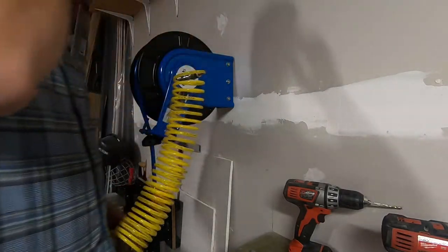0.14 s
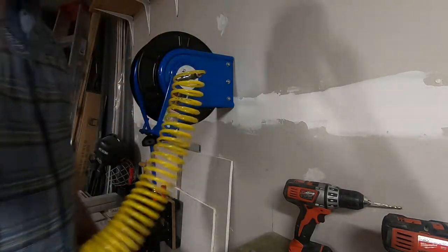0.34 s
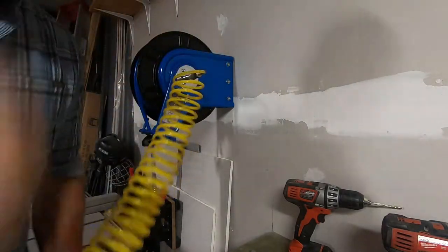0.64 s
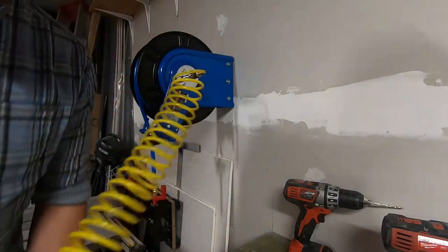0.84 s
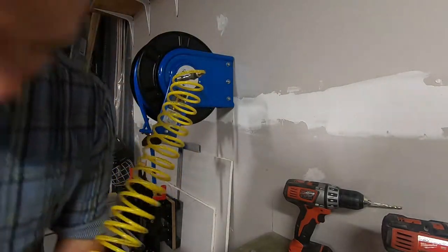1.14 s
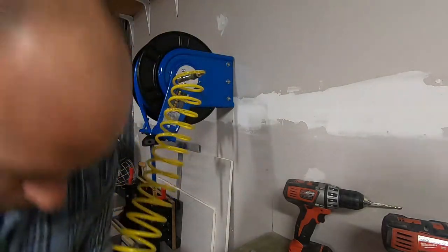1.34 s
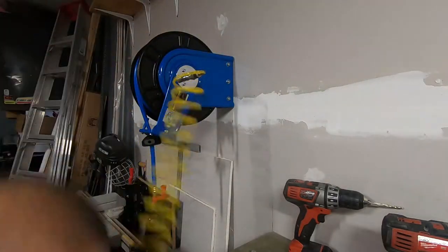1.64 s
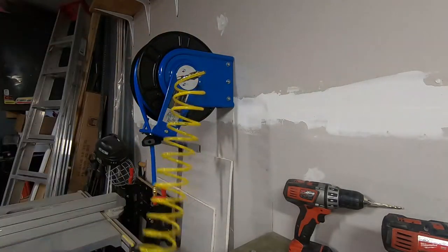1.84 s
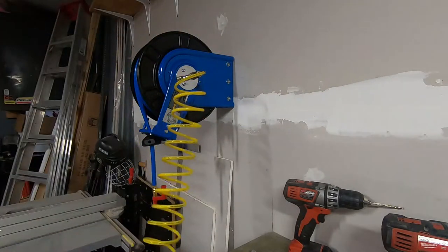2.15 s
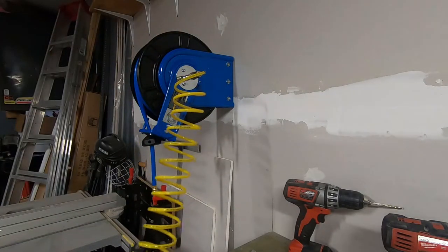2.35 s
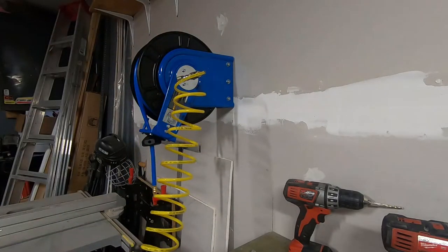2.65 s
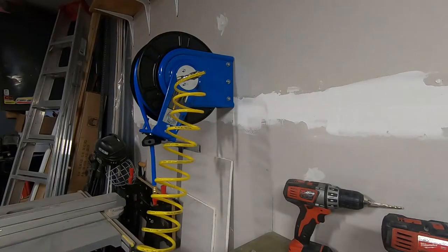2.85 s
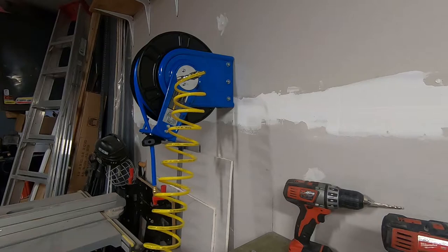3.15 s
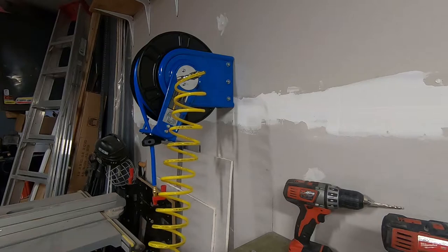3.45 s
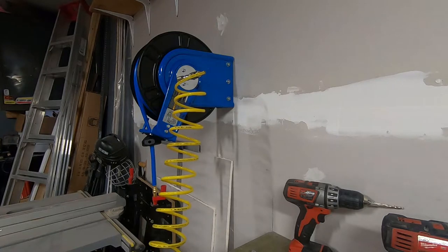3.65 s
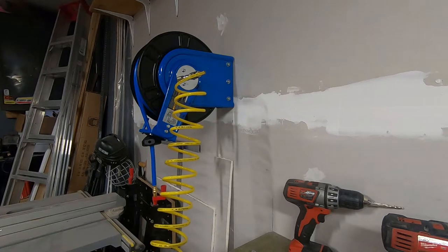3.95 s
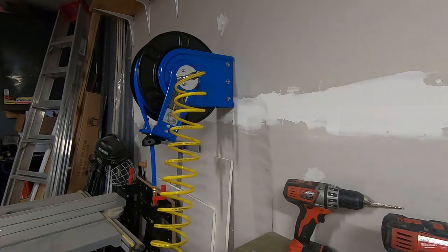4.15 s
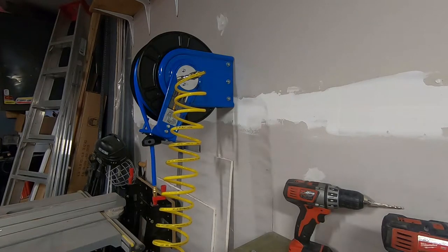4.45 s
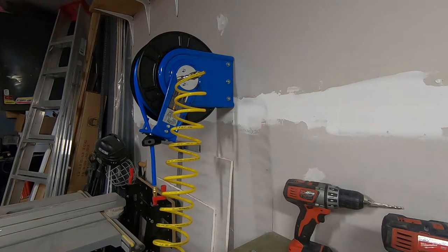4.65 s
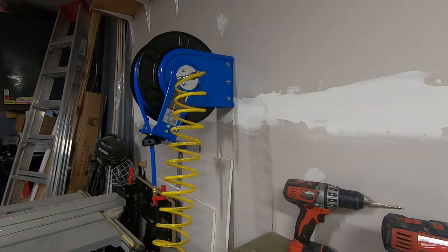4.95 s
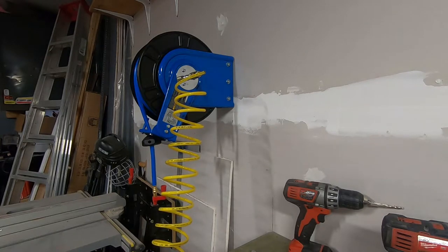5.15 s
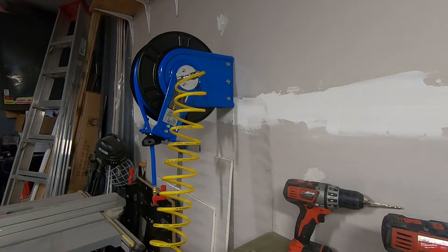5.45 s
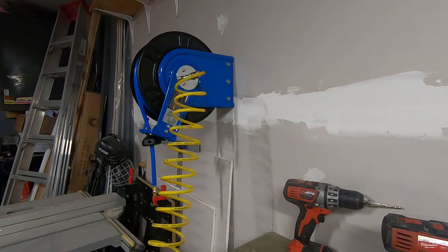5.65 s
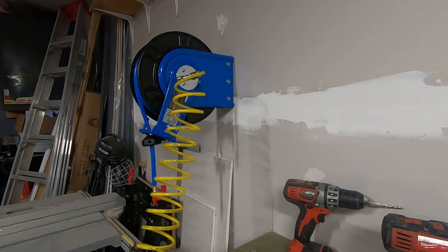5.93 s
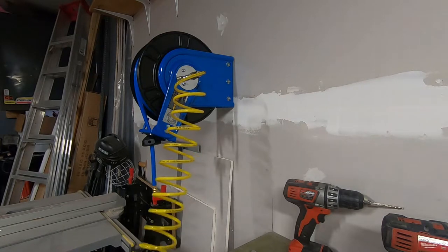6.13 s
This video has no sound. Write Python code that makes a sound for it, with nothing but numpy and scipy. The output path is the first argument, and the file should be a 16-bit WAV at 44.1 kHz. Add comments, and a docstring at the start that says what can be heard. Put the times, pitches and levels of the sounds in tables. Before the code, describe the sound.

Cloth rustles and hose fittings click in a garage, then compressed air spits and rushes out with a loud, high whistle.

```python
"""In a garage a slowly falling motor hum and a small leak lie under everything. From 0.8 s someone
brushes past and fumbles an air hose onto its coupler: cloth rustles, the hose bumps, the fittings
click and ring, the hose squeaks in the grip. At 4.4 s air spits from the half-seated coupler. Once it
seals, air rushes in gusts from the open hose end, which whistles higher as the pressure builds and
now and then breaks into a rasp."""
import sys
import numpy as np
from scipy import signal
from scipy.fft import rfft, irfft, next_fast_len
from scipy.io import wavfile
from scipy.ndimage import uniform_filter1d, minimum_filter1d

SR = 44100
rng = np.random.default_rng(int(sys.argv[2]) if len(sys.argv) > 2 else 0)


def output_pcm(signal):
    """Save a mono or channel-first signal as 16-bit PCM at the path in sys.argv[1].

    Samples are clipped to [-1, 1] before scaling.
    """
    pcm = np.clip(np.atleast_2d(signal).T, -1, 1) * 32767
    wavfile.write(sys.argv[1], SR, np.round(pcm).astype(np.int16))


N = 277389
TIME = np.arange(N) / SR


def undb(db):
    """Decibels to gain."""
    return 10 ** (np.asarray(db) / 20)


def unit(x):
    """Scale to rms 1."""
    return x / np.sqrt(np.mean(x ** 2))


def curve(rows):
    """Linear interpolation of (time, value) rows."""
    return np.interp(TIME, *np.transpose(rows))


def loudness(rows):
    """Gain from (time, dB) rows, fading fast outside their span."""
    outside_s = np.maximum(rows[0][0] - TIME, TIME - rows[-1][0]).clip(0)
    return undb(curve(rows)) * np.exp(-outside_s / 0.0073)


def envelope(start_s, end_s, attack_s, release_s=1):
    """Exponential rise, hold, exponential release."""
    rise = 1 - np.exp(-(TIME - start_s).clip(0) / attack_s)
    return rise * np.exp(-(TIME - end_s).clip(0) / release_s)


def walk(rate_hz):
    """Smooth random drift, rms 1."""
    size = max(int(SR / rate_hz), 1)
    steps = np.repeat(rng.standard_normal(N // size + 2), size)
    return unit(uniform_filter1d(steps, size)[:N])


def spectral(x, response):
    """Filter by a function of frequency."""
    size = next_fast_len(x.shape[-1], real=True)
    hz = np.maximum(np.arange(size // 2 + 1) * SR / size, 1)
    return irfft(rfft(x, size) * response(hz), size)[..., :x.shape[-1]]


def colour(x, points):
    """Filter by (Hz, dB) points."""
    hz, db = np.transpose(points)
    return spectral(x, lambda f: undb(np.interp(np.log(f), np.log(hz), db)))


def band(x, hz, width_hz):
    """One resonance, unity gain at centre."""
    return spectral(x, lambda f: 1 / (1 + 1j * (f - hz ** 2 / f) / width_hz))


def lowpass(x, hz, order):
    """Maximally flat low-pass."""
    return signal.sosfilt(signal.butter(order, min(hz, SR / 3), fs=SR, output="sos"), x)


def pan(db):
    """Constant-power gains for a left-minus-right level."""
    gains = undb(np.array([db, -db]).reshape(2, -1) / 2)
    return gains / np.sqrt(np.mean(gains ** 2, axis=0))


def add(track, start_s, sound):
    """Mix a short sound in."""
    start = int(start_s * SR)
    track[start:start + len(sound)] += sound[:N - start]


# diffuse field: (frequency [Hz], side over mid [dB])
SIDE_SPECTRUM = [(100, -6), (300, -9), (700, -0.5), (3000, -4.5), (5000, -4), (7000, 3.5), (15000, 4)]

def diffuse(size):
    """Noise from all sides: left and right are more alike in the bass."""
    mid, side = rng.standard_normal((2, size))
    side = colour(side, SIDE_SPECTRUM)
    return unit(np.array([mid + side, mid - side]))


def garage(x, wet_db, t60_s=0.55, treble_hz=10100):
    """Direct sound, strong early reflections, then a tail whose treble dies first."""
    t = TIME[:SR // 2]
    noise = diffuse(len(t))
    low = lowpass(noise, treble_hz, order=1)
    tail = (low + (noise - low) * np.exp(-t / .04)) * undb(-60 * t / t60_s)
    early_boost = 1 + 4.2 * np.exp(-t / 0.002)
    response = unit(tail * early_boost * (t > .001)) / np.sqrt(len(t))
    wet = signal.oaconvolve(np.atleast_2d(x), response, axes=1)[:, :N]
    return (x + undb(wet_db) * wet) / np.hypot(1, undb(wet_db))


# motor speed: (time [s], pitch [Hz])
HUM_PITCH = [(0, 134.5), (1.5, 131), (3.2, 126.5), (4.2, 128), (6.29, 124.5)]
# hum: (time [s], relative level [dB])
HUM_LEVEL = [(0.0, -52), (0.24, -47), (0.68, -56.5), (0.96, -48), (1.59, -41.5), (2.61, -51.5), (3.43, -46),
             (3.59, -40), (4.01, -45.5), (4.13, -42), (4.54, -45.5), (4.59, -39.5), (4.75, -48),
             (5.29, -61), (5.94, -56.5), (6.29, -61)]

def motor_hum(gain_db=-2, waver_db=1.37, octave_db=-23, drift_hz=0.28):
    """A coasting motor hums lower as it slows."""
    phase = 2 * np.pi * np.cumsum(curve(HUM_PITCH) + drift_hz * walk(8)) / SR
    tone = unit(np.sin(phase) + undb(octave_db) * np.sin(2 * phase))
    return tone * loudness(HUM_LEVEL) * undb(gain_db + waver_db * walk(9))


# leak hiss: (frequency [Hz], gain [dB])
LEAK_SPECTRUM = [(2500, -48), (3700, -15), (4400, -9.5), (4900, -1.5), (5250, -9.5), (5900, -26),
                 (7300, -26), (11000, -41)]

def leak(level_db=-65):
    """A small leak hisses thinly, swelling and ebbing."""
    return unit(colour(diffuse(N), LEAK_SPECTRUM)) * undb(level_db + walk(5.7))


# room noise: (frequency [Hz], gain [dB])
RUMBLE_SPECTRUM = [(25, 6.5), (80, 26.5), (190, 25), (300, 13.5), (450, 7), (850, 7), (2000, 2.5),
                   (3400, -1.5), (7300, -7.5), (12000, -28)]

def room_rumble(level_db=-61):
    """Low diffuse noise, drifting in level."""
    return unit(colour(diffuse(N), RUMBLE_SPECTRUM)) * undb(level_db + walk(1.1))


# plug contacts: (time [s], relative peak [dB], main pitch [Hz], scrape decay [s], snap gain [dB])
CLICKS = [(0.17, -57, 1300, 0.013, -66), (2.437, -29, 1310, 0.012, -41), (2.588, -29, 1520, 0.007, -42.5),
          (2.615, -37.5, 1260, 0.017, -69), (2.753, -33, 2300, 0.021, -56),
          (3.128, -34, 2100, 0.039, -55.5), (3.249, -38, 1230, 0.0064, -78), (3.318, -40, 2400, 0.018, -56),
          (3.407, -34.5, 1900, 0.016, -51), (3.55, -44.5, 1240, 0.017, -82),
          (3.655, -46.5, 1230, 0.016, -84), (3.712, -42.5, 1380, 0.012, -80),
          (3.734, -34, 920, 0.0083, -83), (4.07, -46, 1600, 0.046, -70), (4.272, -35, 1220, 0.013, -39.5)]
# coupler and reel modes: (frequency [Hz], gain [dB], t60 [s])
METAL_MODES = [(936, -3.5, 0.28), (1233, 6, 0.14), (1309, 3.5, 0.14), (1455, -2, 0.09), (2048, -1, 0.1),
               (2160, -7, 0.2), (2434, -4.5, 0.14), (2915, 4.5, 0.073), (2994, 3, 0.12), (3890, -7, 0.097),
               (4350, -11, 0.05)]
# unpitched click body: (frequency [Hz], gain [dB])
CRACK_SPECTRUM = [(200, -5), (550, -10.5), (850, 3), (1400, 3.5), (2900, 3), (4200, -19.5), (6000, -31),
                  (15000, -77)]
# bright click edge: (frequency [Hz], gain [dB])
SNAP_SPECTRUM = [(2000, -36), (4000, 13.5), (7000, 2), (8500, -11), (10500, -16), (13000, -40)]

def coupler_clicks(gain_db=5, focus_db_per_oct=5, snap_gain_db=3, crack_db=-2.5,
                   detune=0.0092, scatter_db=1.4):
    """The plug scrapes and snaps against the coupler, ringing the metal behind it."""
    out, t = np.zeros(N), TIME[:SR // 2]
    for start_s, peak_db, main_hz, scrape_s, snap_db in CLICKS:
        scrape = rng.standard_normal(len(t)) * np.exp(-t / scrape_s) * (1 - np.exp(-t / 0.0067))
        ring = 0
        for hz, mode_db, t60_s in METAL_MODES:
            # each contact favours modes near one pitch; the grip detunes them
            falloff_db = focus_db_per_oct * abs(np.log2(hz / main_hz))
            strength = undb(mode_db - falloff_db + scatter_db * rng.standard_normal())
            phase = 2 * np.pi * (hz * (1 + detune * rng.standard_normal()) * t + rng.random())
            ring += strength * np.sin(phase) * undb(-60 * t / t60_s)
        crack = undb(crack_db) * unit(colour(scrape, CRACK_SPECTRUM))
        hit = unit(ring * (1 - np.exp(-t / 0.0037))) + crack
        snap = colour(scrape, SNAP_SPECTRUM) * undb(snap_db + snap_gain_db)
        add(out, start_s, hit / abs(hit).max() * undb(peak_db + gain_db) + snap)
    return garage(out, wet_db=5.5)


# shirt and hose strokes: (start [s], end [s], relative body level [dB], sheen level [dB])
STROKES = [(0.8, 0.91, -79, -60.5), (0.955, 1.94, -54.5, -56.5), (1.044, 1.18, -54, -48),
           (1.173, 1.372, -49, -56.5), (1.56, 1.867, -48.5, -55.5), (1.7, 1.778, -43.5, -52),
           (1.925, 2.003, -33.5, -42), (1.96, 2.086, -40, -41), (2.037, 2.106, -34, -52)]
# friction noise: (frequency [Hz], gain [dB])
RUSTLE_SPECTRUM = [(150, -7.5), (250, -11.5), (590, -3.5), (642, -7.5), (799, -8), (1280, -11),
                   (1440, -14.5), (1950, -16), (2830, -22), (7380, -32), (14000, -49.5)]

def rustle(body_gain_db=1, grain_db=3, catch_db=2, attack_s=0.023, release_s=0.035):
    """Cloth and hose slide in tiny catches; lighter contact leaves mostly the sheen."""
    strokes = np.array([envelope(start, end, attack_s, release_s) for start, end, _, _ in STROKES])
    stroke_gains = undb(np.array(STROKES)[:, 2:].T)
    body_gain, sheen_gain = np.sqrt(stroke_gains ** 2 @ strokes ** 2)  # overlaps add in power
    grains = colour(rng.standard_normal(N) * undb(grain_db * walk(1500)), RUSTLE_SPECTRUM)
    grains = signal.sosfilt(signal.butter(4, [130, 11000], "bandpass", fs=SR, output="sos"), grains)
    low = signal.sosfiltfilt(signal.butter(2, 1500, fs=SR, output="sos"), grains)
    sheen = unit(grains - low) * sheen_gain
    body = unit(low * undb(catch_db * walk(45.1))) * body_gain * undb(body_gain_db)
    return garage((body + sheen) * undb(walk(60)), wet_db=0)


# bumps of hose, hands and air: (time [s], relative peak [dB], centre [Hz], t60 [s])
KNOCKS = [(0.806, -43, 570, 0.087), (0.918, -34, 170, 0.072), (1.24, -21.5, 324, 0.063),
          (1.245, -38, 60.7, .15), (1.279, -34.5, 167, 0.13), (1.354, -40, 497, .08),
          (1.429, -34.5, 785, 0.079), (1.43, -38, 3350, 0.062), (1.507, -41, 2800, 0.065),
          (1.506, -27.5, 580, 0.061), (2.209, -25.5, 970, 0.052), (2.207, -37, 2780, 0.18),
          (3.132, -43.5, 47, 0.26), (3.364, -37.5, 170, 0.074), (3.737, -35.5, 1060, 0.05),
          (4.635, -32, 69, 0.038)]

def knocks(gain_db=1, width_ratio=0.97, cutoff_ratio=1.96):
    """Soft, quickly damped bumps, one broad resonance each."""
    out, t = np.zeros(N), TIME[:SR // 2]
    for start_s, peak_db, hz, t60_s in KNOCKS:
        burst = rng.standard_normal(len(t)) * undb(-60 * t / t60_s)
        bump = lowpass(band(burst, hz, width_ratio * hz), cutoff_ratio * hz, order=2)
        add(out, start_s, bump / abs(bump).max() * undb(peak_db + gain_db))
    return garage(out, wet_db=-1.5)


# hose twists: (start [s], end [s], level [dB])
SQUEAKS = [(3.218, 3.265, -35.5), (3.35, 3.397, -53.5)]

def hose_squeaks(pitch_hz=375, sag_hz_per_s=280, octave_db=-28):
    """The hose twists in the grip: short, falling, hollow notes."""
    out = 0
    for start, end, db in SQUEAKS:
        hz = pitch_hz - sag_hz_per_s * (TIME.clip(start, end) - start)
        phase = 2 * np.pi * np.cumsum(hz) / SR
        note = unit(np.sin(phase) + undb(octave_db) * np.sin(2 * phase))
        out += note * envelope(start, end, attack_s=0.0027, release_s=0.016) * undb(db)
    return garage(out, wet_db=-13)


# flow past the plug: (time [s], level [dB])
SPIT_LEVEL = [(4.415, -68), (4.426, -25.5), (4.45, -24.5), (4.51, -18.5), (4.56, -22.5), (4.63, -23),
              (4.67, -40), (4.72, -70)]
# spray: (frequency [Hz], gain [dB])
SPIT_SPECTRUM = [(120, -12), (200, -13.5), (227, -19), (422, -14.5), (728, -16), (812, -9), (1540, -6.5),
                 (1740, -7), (2510, -7), (3550, -2), (4100, -5), (7220, -1), (10600, -9), (15500, -26.5)]

def coupler_spit(flutter_db=1.5, socket_db=-9):
    """Air sprays round the plug until the coupler seals; at full flow the socket sounds hollow."""
    flow = loudness(SPIT_LEVEL)
    spray = unit(colour(rng.standard_normal(N), SPIT_SPECTRUM))
    socket = unit(band(band(rng.standard_normal(N), 1740, 330), 1760, 590))
    socket *= undb(socket_db) * (flow / flow.max()) ** 2
    return garage((spray + socket) * flow * undb(-flutter_db * walk(85)), wet_db=4.5) * pan(db=-1.5)


# hose-end resonances: (centre [Hz], width [Hz], lift [dB])
HOSE_MODES = [(4247, 220, 13.5), (4930, 170, 14), (5794, 116, 13.5), (6146, 46, 8), (6370, 60, 11.5),
              (6596, 42, 4.5)]
# sway of the hose end: (time [s], left minus right [dB])
HOSE_AIM = [(4.66, -2), (4.71, 2.5), (4.775, -4), (4.89, 1), (5.0, 2.5), (5.27, -0.5), (5.36, 2.5),
            (5.41, 6), (5.46, -1), (5.59, -4), (5.735, -0.5), (5.78, -5), (5.855, 11), (5.915, -3.5),
            (5.96, 0.5), (6.05, 1), (6.105, -11), (6.2, -1)]
# breaks into rasp: (start [s], end [s])
RASP_SPELLS = [(4.922, 4.945), (5.046, 5.28), (5.404, 5.435), (5.613, 5.635), (6.163, 6.7)]

def hose_whistle(seal_s=4.645, fill_s=0.132, settle_s=0.65, empty_hz=3690, full_hz=6860, sag_hz_per_s=30,
                 empty_db=-24, full_db=-16, octave_db=-32, waver_db=1.9, scatter_db=1.5,
                 turn_rad_per_s=0.85, break_rad=2.51):
    """Vortices lock to the hose mouth: the tone climbs with pressure, then sags as the tank drains."""
    age_s = (TIME - seal_s).clip(0)
    pressure = 1 - np.exp(-age_s / fill_s)
    hz = empty_hz + (full_hz - empty_hz) * pressure - sag_hz_per_s * age_s
    # the lowest resonance briefly holds the pitch
    held_hz, held_width_hz, _ = HOSE_MODES[0]
    hz -= (hz - held_hz) * np.exp(-((hz - held_hz) / (2 * held_width_hz)) ** 2)

    lift_db = sum(db * np.exp(-((hz - centre) / width) ** 2) for centre, width, db in HOSE_MODES)
    aim_db = curve(HOSE_AIM)
    off_axis_db = -0.05 * abs(aim_db)
    drive_db = empty_db + (full_db - empty_db) * pressure ** 8
    level_db = drive_db + lift_db + off_axis_db + waver_db * walk(25)
    gain = envelope(seal_s - .008, np.inf, attack_s=0.0028) * undb(level_db) * pan(aim_db)

    broken = sum(envelope(*spell, attack_s=0.003, release_s=0.0056) for spell in RASP_SPELLS).clip(0, 1)
    unsettled = np.exp(-age_s / settle_s)
    roughness = 0.1 + 0.45 * unsettled + 0.34 * broken
    jitter_hz = 7 * (0.32 + 2 * roughness) * walk(130)
    phasor = np.exp(2j * np.pi * np.cumsum(hz + jitter_hz) / SR)
    # the right side leads as the hose end turns; near antiphase in a break
    lead_rad = turn_rad_per_s * age_s * (1 - broken) + break_rad * broken
    wave = np.exp(.5j * np.array([-lead_rad, lead_rad])) * phasor + undb(octave_db) * phasor ** 2
    tone = np.sqrt(2 * (1 - roughness ** 2)) * wave.real

    # turbulence shakes amplitude and phase
    shake = lowpass(rng.standard_normal((2, N)), hz=90, order=1)
    shake = unit(lowpass(shake, hz=450, order=2))
    rasp = roughness * ((shake[0] + 1j * shake[1]) * wave).real
    # the settled whistle beams ahead; the early rasp scatters into the room
    beam = garage((tone + rasp * (1 - unsettled)) * gain, wet_db=-17)
    return beam + garage(rasp * unsettled * gain * undb(scatter_db), wet_db=4.5)


# jet flow: (time [s], relative level [dB])
JET_LEVEL = [(4.68, -44), (4.73, -41), (4.78, -35.5), (4.86, -34.5), (4.93, -38.5), (5.2, -37),
             (5.65, -34.5), (5.88, -39), (6.29, -35.5)]
# jet noise: (frequency [Hz], gain [dB])
JET_SPECTRUM = [(100, -31), (300, -23.5), (600, -17.5), (1000, -11), (2200, -8), (3000, 6), (4000, 3.5),
                (5000, 3.5), (6400, 5.5), (7200, 6.5), (7900, -3), (10200, -8.5), (11500, -25),
                (14000, -10), (15000, -14)]
# open-fitting resonances: (centre [Hz], width [Hz], level re rush [dB])
JET_MODES = [(2155, 260, -18), (3000, 370, -20), (3740, 180, -11), (4950, 270, -18), (5850, 120, -11.5),
             (9920, 370, -20.5), (10626, 13, -23)]

def air_jet(gain_db=7, flutter_db=0.59):
    """Turbulent rush of the free jet, coloured by the cavities of the fitting."""
    turbulence = rng.standard_normal(N)
    rush = unit(colour(rng.standard_normal(N), JET_SPECTRUM))
    cavities = sum(undb(db) * unit(band(turbulence, hz, width)) for hz, width, db in JET_MODES)
    jet = lowpass(rush + cavities, hz=13300, order=8)
    return garage(jet * loudness(JET_LEVEL) * undb(gain_db + flutter_db * walk(35)), wet_db=0)


# stirred air: (start [s], end [s], relative level [dB])
GUSTS = [(4.875, 4.914, -45.5), (4.978, 5.144, -43.5), (5.25, 5.456, -49), (5.63, 5.702, -51.5),
         (5.757, 6.03, -45), (6.222, 6.29, -52.5)]

def gusts(gain_db=-2.5, flutter_db=2.5):
    """Low eddies buffet each side of the microphone independently."""
    eddies = unit(band(band(rng.standard_normal((2, N)), 30, 52), 40, 77))
    swell = sum(undb(db) * envelope(*span, attack_s=0.011, release_s=0.083) for *span, db in GUSTS)
    return eddies * swell * undb(gain_db + flutter_db * walk(22)) * pan(db=6)


def scene():
    """Background, then handling, then escaping air."""
    background = motor_hum() + leak() + room_rumble()
    handling = coupler_clicks() + rustle() + knocks() + hose_squeaks()
    air = coupler_spit() + hose_whistle() + air_jet() + gusts()
    return background + handling + air


def record(dry, ceiling=0.4, cutoff_hz=15300):
    """Peak limiter, then a steep low-pass."""
    gain = np.minimum(1, ceiling / (abs(dry).max(axis=0) + 1e-9))
    gain = uniform_filter1d(minimum_filter1d(gain, size=256), size=256)
    return signal.sosfilt(signal.ellip(8, .2, 80, cutoff_hz, fs=SR, output="sos"), dry * gain)


dry = scene()
out = record(dry)
output_pcm(out)
```